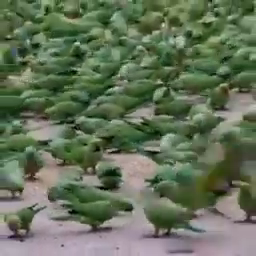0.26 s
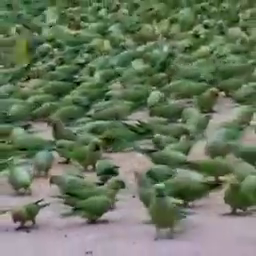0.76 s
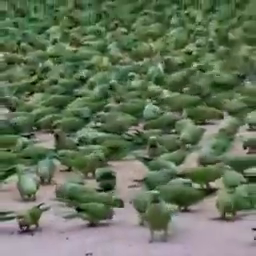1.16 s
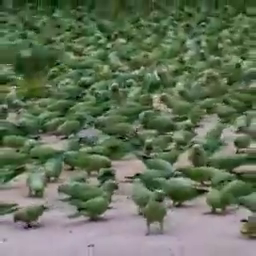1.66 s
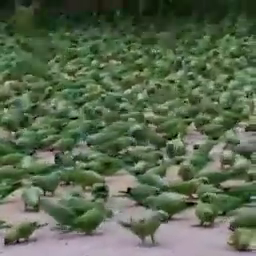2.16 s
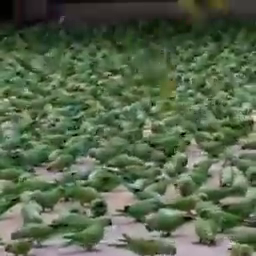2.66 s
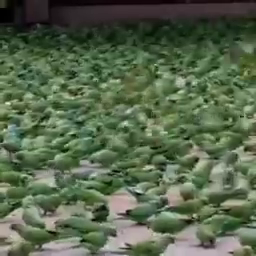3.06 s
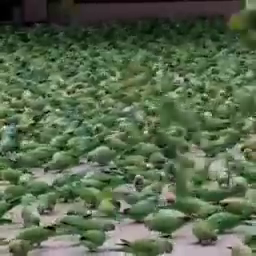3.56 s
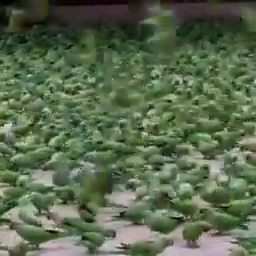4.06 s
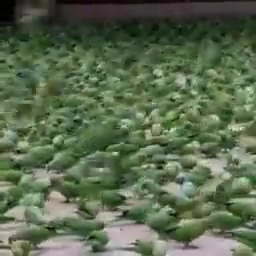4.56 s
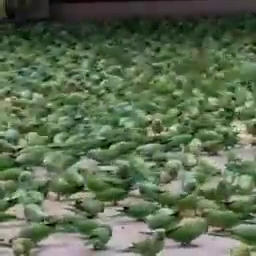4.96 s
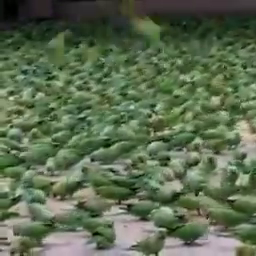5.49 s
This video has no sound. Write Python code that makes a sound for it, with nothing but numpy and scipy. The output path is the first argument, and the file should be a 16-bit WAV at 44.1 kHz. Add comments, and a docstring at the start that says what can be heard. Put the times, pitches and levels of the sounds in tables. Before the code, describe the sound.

Hundreds of parakeets feeding on open ground make a continuous, dense, shrill din of very short overlapping screeches. Close birds stand out with loud trilled squawks, strongest in the first second and mostly to the left, then sparser rasps and chips. Faint low wing flutters pass. Walls give a short scattered echo; a stereo handheld microphone stands near the edge of the flock, and the sound fades down at the end.

```python
"""In a walled yard, hundreds of parakeets feed and squabble on the ground, a few of them close by.
Near birds give arched, trilled screeches built of four partials, and harsh rasps of pulsed, ringing noise.
Short gliding tones make yips, whistles and thin chips; 860 softer screeches and a noise wash make the flock.
Wings flutter as beating low noise, the walls return the calls as scattered echoes, and a far town murmurs.
Towards the end the background is faded out, ever faster."""
import sys
import numpy as np
from scipy import signal
from scipy.fft import rfft, irfft, next_fast_len
from scipy.io import wavfile

SR = 44100
rng = np.random.default_rng(int(sys.argv[2]) if len(sys.argv) > 2 else 0)


def dump_mix(stems):
    """Bounce the given channels to the path in sys.argv[1] as a 16-bit WAV at rate SR."""
    frames = np.atleast_2d(stems).T  # one column per channel
    limited = np.clip(frames, -1, 1)  # hard clip at full scale
    pcm = np.round(limited * 32767).astype(np.int16)
    wavfile.write(sys.argv[1], SR, pcm)


N = 252693  # length of the scene in samples

# Strength of the partials of a voice. One row: level in dB of partials 1 to 4.
PARTIAL_LEVELS = [-14.5, -4.5, -18, -15.5]
FLICKER_DB = 2.5  # wander of each partial
THROB = .7  # how deeply the trill shakes the level of a near voice (0-1)


def screech(length, first_hz, top_hz, last_hz, top_at, depth, trill_hz, rough,
            jitter=0.117, throb=THROB, air_db=-7):
    """An arched whistle of the syrinx, the bird's voice organ; near its top a fast trill and tension roughen it."""
    size = int(length * SR)
    u = np.linspace(0, 1, size)
    # the given pitches are those of the strong second partial
    climb = (first_hz - top_hz) * (1 - u / top_at) ** 2
    # before the top this share would be negative, so it is held at zero
    past_top = np.maximum((u - top_at) / (1 - top_at), 0)
    arch = top_hz + np.where(u < top_at, climb, (last_hz - top_hz) * past_top ** 1.7)

    turn = 2 * np.pi * np.cumsum(trill_hz * (1 + 0.105 * walk(size, 70.5))) / SR
    onset = np.clip(1.6 * u / top_at - .7, 0, 1)
    trill = onset * (np.sin(turn) - 0.3 * np.sin(2 * turn))  # slow rise, quick drop
    strain = abs(rough) * (1 + onset) / 2
    pitch = arch / 2 * (1 + depth * trill + strain * jitter * walk(size, 2600))
    phase = 2 * np.pi * np.cumsum(pitch) / SR

    tone = np.zeros(size)
    for k, db in enumerate(PARTIAL_LEVELS, 1):
        flicker = undb(db + FLICKER_DB * walk(size, 341.6))  # each partial on its own
        tone += flicker * np.sin(k * phase) * (k * pitch < SR / 2)

    # a crackle of air escapes at each drop of the trill
    puff = (1 - np.cos(turn)) ** 2 / 2
    air = undb(air_db) * np.sqrt(strain) * puff * rng.standard_normal(size)
    shake = (1 + throb * onset * np.cos(turn - 1)) * undb(2.1 * strain * walk(size, 574.0))
    return unit((tone * shake + air) * swell(size, 0.026, 0.087))


# a near screech peaks in pitch at this share of its length; shares spent swelling and dying
TOP_AT, SCREECH_RISE, SCREECH_FALL = .32, 0.11, 0.18
# average trill rate; trill depth as a share of the pitch, at roughness 1
TRILL_HZ, TRILL_DEPTH = 110.3, 0.244


def squawk(length, top_hz, climb, sag, rough):
    """A near bird's screech climbs to its top, then sags as the air runs out; a rougher voice trills deeper."""
    first_hz = top_hz * (1 - climb)
    last_hz = top_hz * (1 - sag)
    depth = TRILL_DEPTH * np.sqrt(abs(rough))
    call = screech(length, first_hz, top_hz, last_hz, TOP_AT, depth, TRILL_HZ, rough)
    return unit(call * swell(len(call), SCREECH_RISE, SCREECH_FALL))


# Screeches of the near birds. Each row: start in seconds, length in seconds, top pitch in Hz of the second
# partial, share of the pitch climbed at the start, share lost by the end, roughness (0 is smooth, 1 harsh),
# relative level in dB, side (+1 left, -1 right).
SCREECH_CALLS = [ (0.0, 0.045, 5450, 0.029, .2, 0.6, -30.5, 0.83),
                 (0.147, 0.087, 6120, 0.067, 0.34, 0.17, -33.5, 0.92),
                 (0.317, 0.11, 5674, .1, .28, 0.58, -29.5, -0.31),
                 (0.517, 0.12, 5530, 0.093, 0.13, 0.6, -23, .9),
                 (0.759, 0.099, 5204, 0.24, 0.24, 0.25, -21, 0.89),
                 (0.857, 0.077, 3900, .05, 0.075, 0.52, -32, 0),
                 (0.859, 0.055, 8100, 0.039, 0.2, .35, -34, .47),
                 (0.983, 0.07, 6183, .28, .31, 0.02, -21.5, 0.89),
                 (1.028, 0.041, 4000, 0.0073, 0.13, 0.14, -30.5, -0.0093),
                 (1.243, 0.077, 3900, .15, .06, 0.3, -43, 0),
                 (1.268, 0.072, 6200, 0.17, 0.053, 0.47, -39, 0),
                 (1.733, 0.1, 4830, 0, 0.0037, 0.2, -33, -0.35),
                 (2.208, 0.044, 4430, .05, 0.016, 0.3, -35, -0.63),
                 (2.405, .13, 4920, 0.19, 0.11, 0.77, -39, -0.46),
                 (2.688, 0.053, 5920, .12, 0.14, 0.65, -39.5, 0.21),
                 (2.936, .13, 3954, .04, .05, .25, -37, -.3),
                 (3.289, 0.062, 5320, 0.065, .21, 0.28, -28, 1),
                 (3.539, .076, 5650, .08, 0.32, 0.29, -26, 1),
                 (3.798, 0.12, 5270, .14, 0.14, 0.91, -33, -0.26),
                 (4.072, 0.11, 4345, .07, 0.0062, 0.44, -38, -.48),
                 (4.361, 0.13, 4720, .12, 0.11, 1.02, -38, 0), (4.606, 0.15, 3700, 0, 0.2, 0.42, -41, 0.86),
                 (5.243, 0.12, 5480, 0, 0.3, .8, -41, 0.3),
                 (5.469, 0.12, 5580, .16, 0.37, 0.83, -40.5, 0.51)]
# How throat and beak colour a voice. Each row: frequency in Hz, gain in dB.
BEAK_COLOUR = [(600, -33), (1200, -17), (1900, -6.5), (2800, -2), (3500, -2), (4500, -0.5), (5400, -0.5),
               (6300, -4), (7100, -7), (9200, -7.5), (9900, -14), (12500, -9.5), (14000, -37)]


def near_screeches():
    """The near birds' screeches, placed in the yard and coloured by the beak."""
    # even_db: level in dB at which echo equals direct sound; nearness: dB of echo share lost per dB louder
    return colour(perch(squawk, SCREECH_CALLS, even_db=-26, nearness=.35), BEAK_COLOUR)


# Hiss sprayed around a rasp. Each row: frequency in Hz, gain in dB.
SPRAY_TONE = [(700, -19), (1400, 2.5), (2000, 5), (3000, 9.5), (5000, -3), (9200, 4.5), (10000, 1),
              (13500, -11)]


def rasp(length, rate_hz, low_hz, high_hz, high_db, width_hz, open_share=0.27, spray_db=-3):
    """The syrinx slaps open about a hundred times a second; each puff rings two resonances of throat and beak."""
    size = int(length * SR)
    cycle = np.cumsum(rate_hz * (1 + .07 * walk(size, 80))) / SR % 1
    pulses = np.exp(-cycle / open_share) + 0.19
    puffs = pulses * rng.standard_normal(size) * swell(size, .25, .25)
    rings = []
    for hz in (low_hz, high_hz):
        band = [hz - width_hz / 2, hz + width_hz / 2]
        b, a = signal.butter(2, band, "band", fs=SR)
        rings.append(unit(signal.lfilter(b, a, puffs)))
    spray = unit(colour(puffs, SPRAY_TONE))
    return unit(rings[0] + undb(high_db) * rings[1] + undb(spray_db) * spray)


# average pulse rate; width of both resonances as a share of the lower one's frequency
RASP_PULSE_HZ, RASP_WIDTH = 108.6, 0.31


def scold(length, low_hz, high_hz, high_db):
    """A near bird's rasp: the higher the throat rings, the broader its resonances."""
    return rasp(length, RASP_PULSE_HZ, low_hz, high_hz, high_db, RASP_WIDTH * low_hz)


# Rasps of the near birds. Each row: start in seconds, length in seconds, lower resonance in Hz, upper
# resonance in Hz, upper resonance against the lower in dB, level in dB, side (+1 left, -1 right).
RASP_CALLS = [ (0.465, 0.05, 4030, 5700, 3, -31.5, 0.43), (0.485, 0.075, 1900, 4840, 5, -37.5, 0),
              (1.504, 0.1, 5060, 6850, -5, -35, -0.62), (1.658, .11, 4070, 5600, 2.5, -39, -0.084),
              (1.919, 0.072, 4400, 5900, 1.5, -38, 0.00031), (2.188, 0.062, 4900, 8700, -1, -43, -.3),
              (2.265, .062, 4540, 6300, -5, -37, -.4), (2.949, 0.13, 3920, 6260, 0, -35, -.29),
              (3.015, 0.1, 4400, 5940, -1.5, -32, -0.5), (3.115, .079, 4300, 6270, 15, -41.5, 0),
              (3.314, 0.052, 2250, 4460, 8.5, -31.5, .6), (3.567, 0.079, 2330, 4450, 10, -31, 0.64),
              (3.61, 0.097, 4050, 6000, 2.5, -35, 0.26), (4.587, .04, 6440, 8000, -18, -38.5, .2),
              (4.624, .077, 5070, 6000, -3, -41, 0), (4.788, 0.063, 4100, 5530, 1, -41, 0),
              (4.981, 0.14, 4800, 6000, -6, -40.5, -0.085)]


def near_rasps():
    """The near birds' rasps, placed in the yard."""
    return perch(scold, RASP_CALLS, even_db=-24.5, nearness=0.12)


YIP_S, YIP_ARCH = 0.02, .24  # length; share of the pitch climbed and lost again


def yip(top_hz, rough=0.019):
    """One clean, nearly even arch of the syrinx, with no trill in its pitch."""
    foot_hz = top_hz * (1 - YIP_ARCH)
    return screech(YIP_S, foot_hz, top_hz, foot_hz, 0.565, 0, TRILL_HZ, rough)


def chip(length, first_hz, last_hz, waver=0.01):
    """A thin whistle: a single tone that drops in pitch and wavers slightly."""
    size = int(length * SR)
    pitch = np.linspace(first_hz, last_hz, size) * (1 + waver * walk(size, 950))
    return unit(np.sin(2 * np.pi * np.cumsum(pitch) / SR) * swell(size, 0.16, 0.12))


WHISTLE_SAG_HZ_PER_S = 3320
CHIP_S, CHIP_FIRST_HZ, CHIP_LAST_HZ = .021, 7780, 5970
# Quick arched yips. Each row: start in seconds, top pitch in Hz, relative level in dB.
YIP_CALLS = [(1.074, 4740, -31.5), (4.747, 4920, -39.5), (4.783, 5650, -37.5), (5.023, 4700, -38.5),
             (5.037, 4600, -42), (5.067, 4700, -44)]
# Plain whistles. Each row: start in seconds, length in seconds, first pitch in Hz, relative level in dB.
WHISTLE_CALLS = [(0.329, 0.056, 4600, -30.5), (0.83, .037, 1786, -46), (1.657, .035, 8500, -37),
                 (1.659, 0.031, 4100, -38), (2.03, 0.015, 3570, -31.5), (2.073, 0.025, 3355, -41),
                 (4.481, .045, 1580, -49.5), (4.688, 0.072, 1656, -48), (4.991, 0.033, 3550, -46)]
# Thin high chips, all with the same fall. Each row: start in seconds, relative level in dB.
CHIP_CALLS = [(0.66, -51), (1.493, -43), (2.596, -48), (2.621, -41), (2.652, -43), (4.352, -44),
              (4.385, -42), (4.411, -47), (4.833, -46), (5.392, -50)]


def clear_notes(whistle_side=0.15, chip_side=0.54):
    """Yips, whistles and chips: short, clear tones among the harsh calls."""
    out = np.zeros((2, N))
    for start, hz, db in YIP_CALLS:
        add(out, undb(db) * unit(colour(yip(hz), BEAK_COLOUR)), start, 0)
    for start, length, hz, db in WHISTLE_CALLS:
        last_hz = hz - WHISTLE_SAG_HZ_PER_S * length
        add(out, undb(db) * chip(length, hz, last_hz), start, whistle_side)
    for start, db in CHIP_CALLS:
        add(out, undb(db) * chip(CHIP_S, CHIP_FIRST_HZ, CHIP_LAST_HZ), start, chip_side)
    return out


def near_birds():
    """The calls that stand out of the flock, with their echoes."""
    screeches = near_screeches()
    rasps = near_rasps()
    notes = clear_notes()
    return undb(1.0) * screeches + rasps + undb(-3) * notes + undb(-8.0) * yard(notes)


# Tone of the shrill wash. Each row: frequency in Hz, gain in dB.
WASH_COLOUR = [(700, -6.5), (1400, 3), (1900, -3), (2700, 2), (4800, -8), (6500, 3), (9000, -7.5),
               (10000, -7), (13000, -13), (15000, -91)]


def flock(count=860, centre_hz=4600, spread=.23, scatter_db=2.5, blur_db=-4):
    """Hundreds of further birds, each with its own pitch and loudness; the furthest blur into a shrill wash."""
    out = np.zeros((2, N))
    for k, (when, length, top_at, depth, rough, side) in enumerate(rng.random((count, 6))):
        pitch, loud = np.clip(rng.standard_normal(2), -2, 2)
        hz = centre_hz * np.exp(spread * pitch)
        call = screech(.035 + .08 * length, .84 * hz, hz, .78 * hz, 0.1956 + 0.3925 * top_at,
                       0.16 * depth ** 2, 90 + 35 * side, 0.095 + 0.63 * rough, throb=0.74)
        start = (k + when) / count * N / SR  # spread evenly over the scene
        add(out, undb(scatter_db * loud) * call, start, 2 * side - 1)
    wash = unit(colour(rng.standard_normal((2, N)), WASH_COLOUR))
    wash = wash * undb(2 * np.array([walk(N, 40), walk(N, 40)]))
    return unit(unit(colour(out + yard(out), BEAK_COLOUR)) + undb(blur_db) * wash)


# Rise and fall of the flock's din. Each row: time in seconds, relative level in dB.
DIN_LEVEL = [(0.0, -39.5), (0.96, -38), (1.07, -39), (1.35, -44), (1.56, -41), (1.71, -39.5), (2.36, -39.5),
             (2.81, -44), (3.0, -44.5), (3.13, -38.5), (3.57, -42.5), (3.7, -37.5), (4.42, -45),
             (4.58, -42.5), (5.28, -48.5), (5.73, -51.5)]


def din():
    """The flock's calls, made louder and softer along the level table."""
    return flock() * undb(curve(DIN_LEVEL) + 3.0)


STIR_DB, STIR_FADE_DB = -57, 3  # middle level of the stirred air; its fade-out in dB per second squared
# Wings passing close. Each row: start in seconds, length in seconds, level in dB.
WING_PASSES = [(0.714, 0.091, -46), (1.018, 0.17, -53), (1.242, 0.17, -44), (1.894, 0.19, -47.5),
               (2.18, 0.22, -46.5), (3.084, 0.096, -44), (3.218, 0.13, -48), (3.525, 0.047, -54),
               (3.734, 0.075, -53), (4.28, 0.087, -48), (5.276, 0.048, -52.5)]
# Tone of the pushed air. Each row: frequency in Hz, gain in dB.
WING_TONE = [(20, -38), (45, -0.5), (75, 2), (130, -4.5), (220, -13.5), (400, -23.5), (1500, -32)]


def wings(beat_hz=15, beat_depth=0.28, gust_db=7):
    """Each beat of a near wing pushes a puff of air at the microphone; birds further off keep the air stirring."""
    push = np.zeros((2, N))
    for start, length, db in WING_PASSES:
        size = int(length * SR)
        beats = 1 - beat_depth * np.cos(2 * np.pi * beat_hz * np.arange(size) / SR)
        add(push, undb(db) * unit(beats * swell(size, 0.18, 0.31)), start, 0)
    gusts = gust_db * np.tanh(walk(N, 22))
    stir = undb(STIR_DB - fade_out(STIR_FADE_DB) + gusts)
    return np.hypot(push, stir) * low_noise(WING_TONE, side_db=-6)


TOWN_DB, TOWN_FADE_DB = -50.5, 2  # level before the fade-out; its fade-out in dB per second squared
# Tone of the far town. Each row: frequency in Hz, gain in dB.
TOWN_TONE = [(20, 3.5), (70, 4.5), (130, -8.5), (220, -5.5), (340, 1.5), (430, -5), (540, -2.5), (660, 4.5),
             (900, -0.5), (1400, -2.5), (2200, -6.5), (5000, -20)]


def town():
    """The murmur of a far town: low noise, almost the same in both ears."""
    return low_noise(TOWN_TONE, side_db=-21) * undb(TOWN_DB - fade_out(TOWN_FADE_DB))


FADE_FROM_S = 3.41


def fade_out(rate_db):
    """Decibels taken off as the background is faded out, ever faster."""
    return rate_db * np.maximum(np.arange(N) / SR - FADE_FROM_S, 0) ** 2


def low_noise(points, side_db):
    """Coloured noise that is much the same left and right."""
    mid, side = colour(rng.standard_normal((2, N)), points)
    return unit(mid + undb(side_db) * side * np.array([[1], [-1]]))


# Tone of the echo. Each row: frequency in Hz, gain in dB.
ECHO_COLOUR = [(500, -12), (3000, 0), (5000, -1.5), (8000, 6), (14000, 1)]


def yard(x, tail_db=-14, t60_s=0.56):
    """The echo alone: ground and nearby bodies scatter the sound at once, the walls add a longer tail."""
    t = np.arange(SR * 3 // 4) / SR
    scatter = rng.standard_normal((2, len(t))) * (rng.random((2, len(t))) < .08)  # sparse reflections
    early = np.exp(-t / .012)
    tail = undb(tail_db - 60 * t / t60_s)  # falls 60 dB in t60_s
    echo = scatter * (t > .002) * (early + tail)
    energy = np.sum(echo ** 2, axis=1, keepdims=True)
    echo = colour(echo / np.sqrt(energy), ECHO_COLOUR)
    return signal.fftconvolve(x, echo, axes=1)[:, :N]


def perch(voice, table, even_db, nearness):
    """Place calls in the yard; at even_db echo and direct sound are equal, louder birds are nearer and drier."""
    direct, send = np.zeros((2, 2, N))
    for start, *shape, db, side in table:
        wet = undb(nearness * (even_db - db))
        call = undb(db) * voice(*shape) / np.hypot(1, wet)
        add(direct, call, start, side)
        add(send, wet * call, start, side / 2)
    return direct + yard(send)


def add(out, x, start, side, lag_s=.00013, side_db=5.5):
    """Mix a sound in; the nearer ear gets it sooner and louder."""
    for channel, sign in enumerate((1, -1)):
        lag = int(round(lag_s * SR * (1 - sign * np.tanh(2 * side)) / 2))
        i = max(int(start * SR), 0) + lag
        part = x[:max(N - i, 0)]
        out[channel, i:i + len(part)] += part * undb(sign * side * side_db / 2)


# Gain of the left-right difference. Each row: frequency in Hz, gain in dB.
PORT_DIFFERENCE = [(700, -16), (1400, -7), (2500, -0.5), (4500, 1.5), (8000, -0.5)]


def ports(x):
    """Two microphone ports close together: long waves reach both alike."""
    mid = (x[0] + x[1]) / 2
    side = colour((x[0] - x[1]) / 2, PORT_DIFFERENCE)
    return np.array([mid + side, mid - side])


def undb(db):
    """Decibels to gain."""
    return 10 ** (np.asarray(db) / 20)


def unit(x):
    """Scale to an rms (average strength) of 1."""
    return x / np.sqrt(np.mean(x ** 2) + 1e-18)


def curve(rows):
    """Join rows of time in seconds and value by straight lines."""
    return np.interp(np.arange(N) / SR, *np.transpose(rows))


def colour(x, points):
    """Filter by a spectrum of points, each a frequency in Hz and a gain in dB."""
    hz, db = np.transpose(points)
    size = next_fast_len(x.shape[-1])
    f = np.maximum(np.fft.rfftfreq(size, 1 / SR), 1)
    gain = undb(np.interp(np.log(f), np.log(hz), db))
    return irfft(rfft(x, size) * gain, size)[..., :x.shape[-1]]


def walk(size, rate):
    """Random wander of spread near 1 that takes a new direction up to `rate` times a second."""
    steps = rng.standard_normal(1024)
    return np.interp(np.arange(size) * rate / SR, np.arange(len(steps)), steps)


def swell(size, rise, fall):
    """Envelope that rises and falls over the given shares of its length."""
    u = np.linspace(0, 1, size)
    return np.sin(np.pi / 2 * np.clip(np.minimum(u / rise, (1 - u) / fall), 0, 1))


def scene():
    """Near birds and the flock in their yard, wings, and the town beyond."""
    birds = ports(near_birds() + din())
    return birds + wings() + town()


TOP_HZ = 13500


def record(dry):
    """The recorder cuts steeply above its top frequency."""
    return signal.sosfilt(signal.ellip(10, .2, 80, TOP_HZ, fs=SR, output="sos"), dry)


dry = scene()
out = record(dry)
dump_mix(out)
```